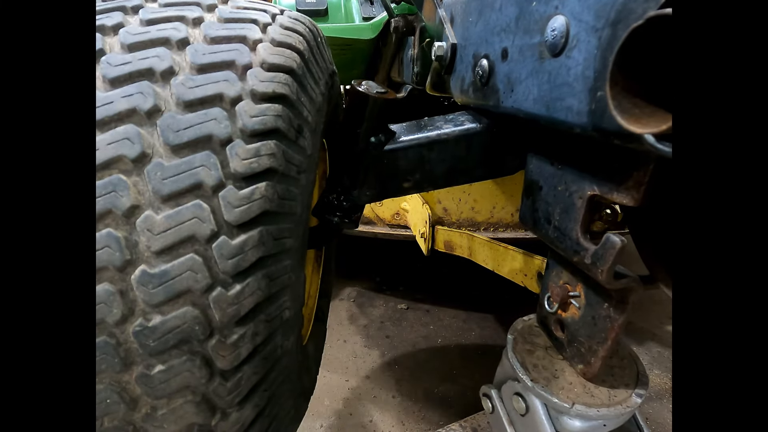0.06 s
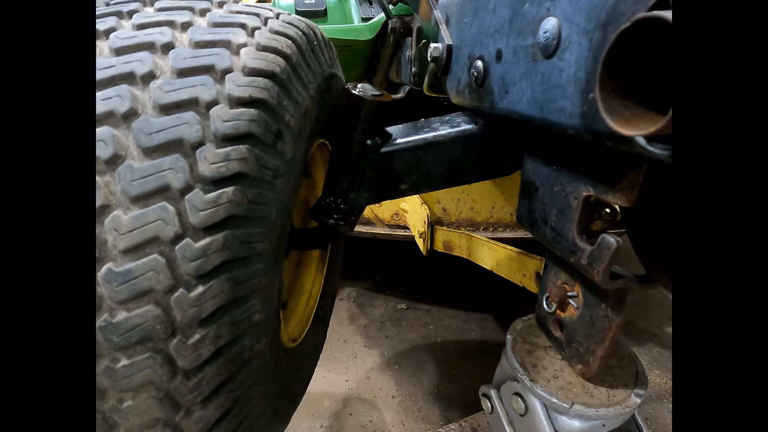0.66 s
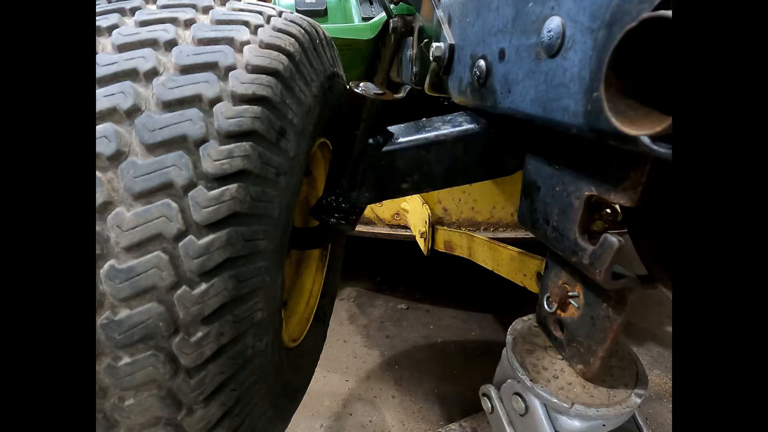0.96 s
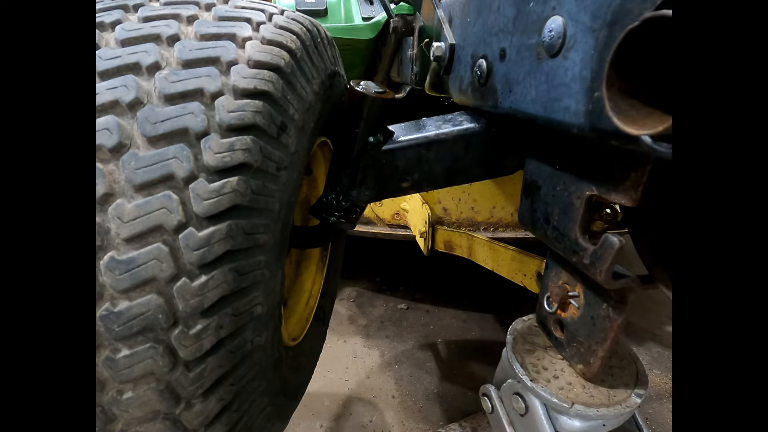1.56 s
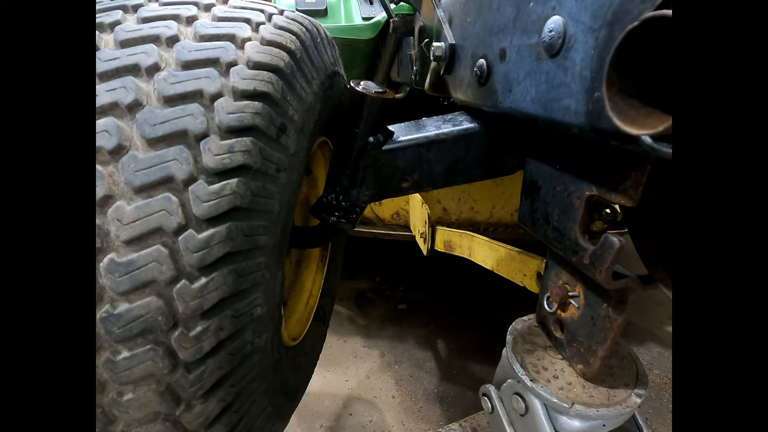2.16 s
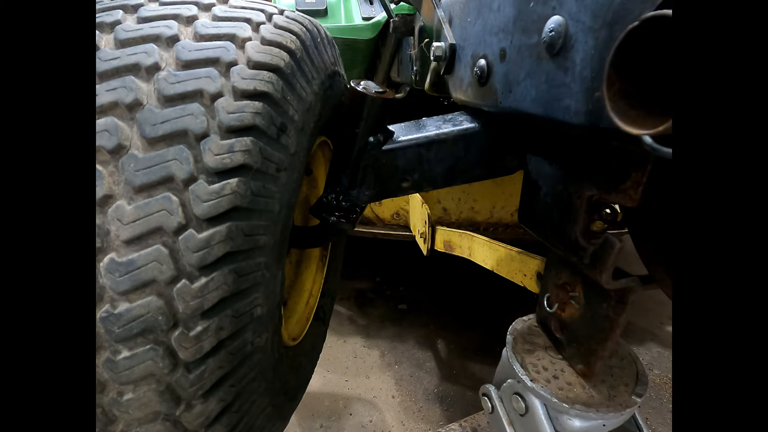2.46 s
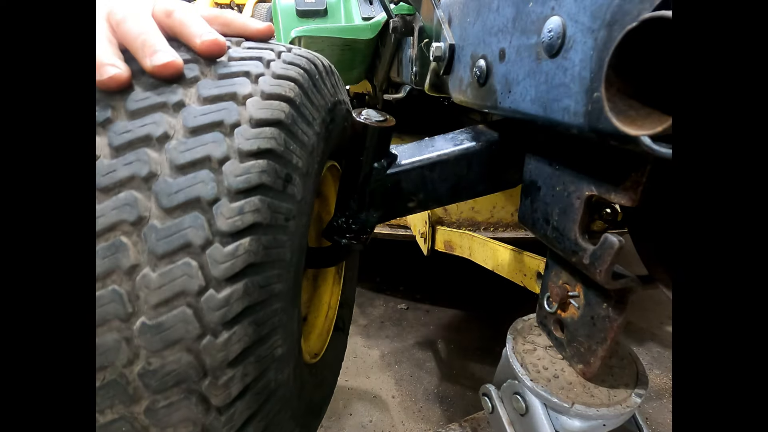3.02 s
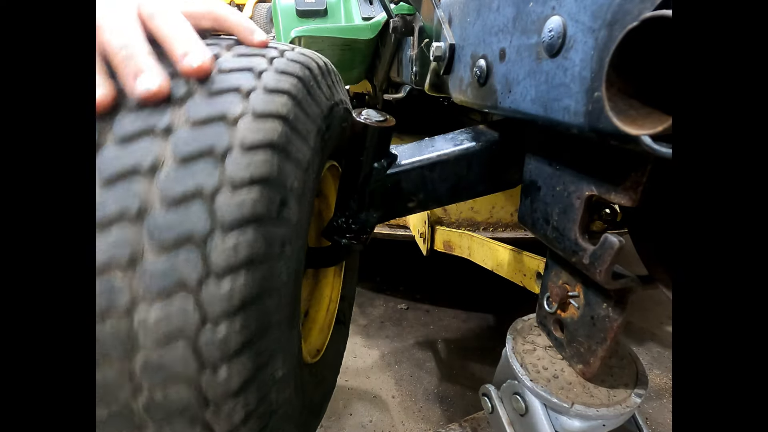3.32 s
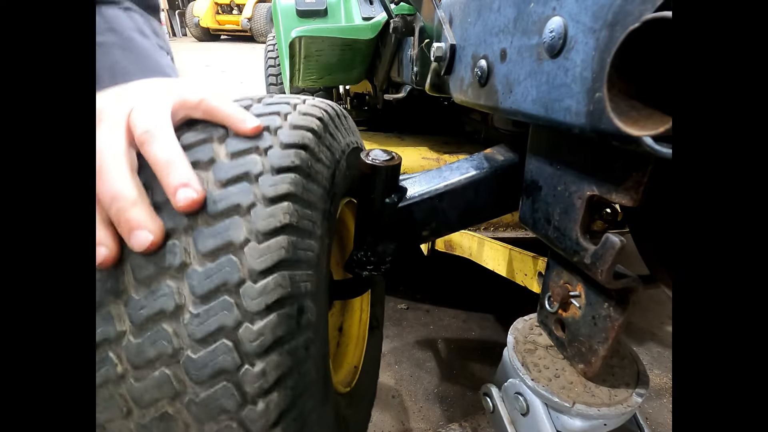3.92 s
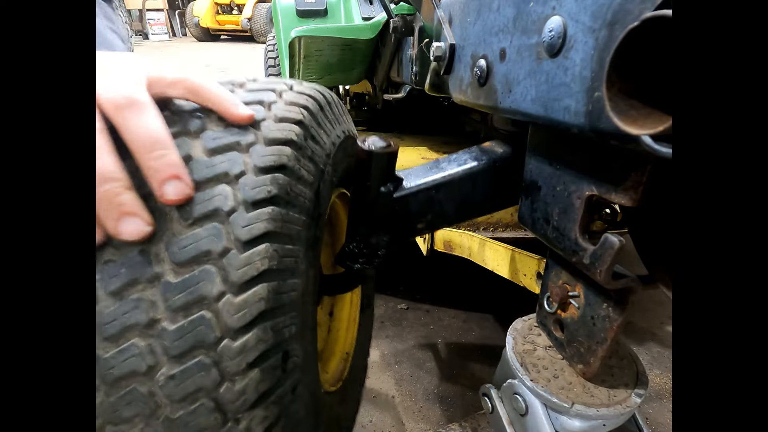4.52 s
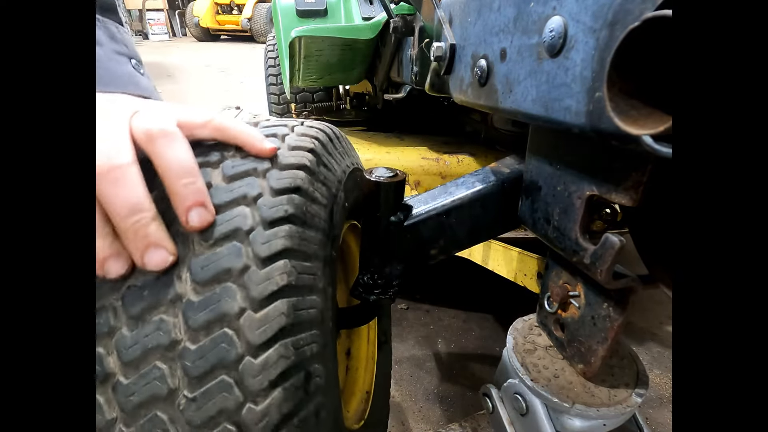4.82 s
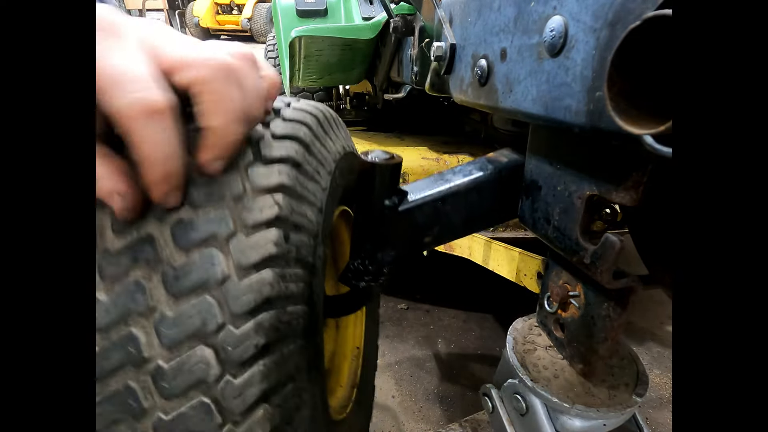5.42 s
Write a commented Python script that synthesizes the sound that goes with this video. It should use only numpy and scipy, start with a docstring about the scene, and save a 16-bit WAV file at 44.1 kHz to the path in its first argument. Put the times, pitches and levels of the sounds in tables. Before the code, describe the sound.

Rusted metal steering parts on a mower grind, creak and knock, ending in a heavy clunk that hums through the frame. After a lull, a hand thumps the rubber tyre and slides across it, snapping bits of grit. The linkage then bangs and rattles against its stop twice, with a short creak, before one more hollow tyre thump. Everything is close, with slight workshop echo over a low background hum.

```python
"""Close by in a workshop, the front wheel of a jacked-up mower is steered from lock to lock.
The rusty linkage scrapes and squeaks, then clunks against its stop, shaking the frame.
A hand slaps the tyre and rubs over its gritty tread. The wheel swings twice more, each time
hitting a stop hard and rattling in its slack, and one last slap lands on the tyre."""
import sys
import numpy as np
from scipy import signal
from scipy.fft import rfft, irfft
from scipy.io import wavfile
from scipy.ndimage import uniform_filter1d, minimum_filter1d

SR = 44100
rng = np.random.default_rng(int(sys.argv[2]) if len(sys.argv) > 2 else 0)


def put_to_file(sound):
    """Save the sound as 16-bit audio at rate SR, in the file named by the first command-line argument."""
    columns = np.atleast_2d(sound).T  # one column per channel
    safe = np.clip(columns, -1, 1)
    whole_steps = np.round(safe * 32767)
    wavfile.write(sys.argv[1], SR, whole_steps.astype(np.int16))


N = 250488

# Blows in the linkage. Each row: start in seconds, then clank, thud and hard edge levels in dB.
BLOWS = [(0.009, -47, -39, -52), (0.119, -46, -54, -50), (0.447, -29, -39, -28), (0.518, -28.5, -42, -27.5),
         (0.556, -24, -19.5, -32), (0.656, -30.5, -28, -34.5), (0.798, -33, -26, -37.5),
         (0.869, -25.5, -48, -33), (0.921, -27.5, -54, -31.5), (1.172, -36, -36, -41),
         (1.329, -19.5, -9.5, -33.5), (1.351, -20.5, -28, -29.5), (1.371, -32, -14.5, -56),
         (1.439, -39.5, -27, -52), (1.475, -32, -40, -42.5), (1.809, -41, -57.5, -48),
         (1.874, -40.5, -55, -42), (3.764, -15.5, -14, -25.5), (3.788, -16.5, -6.5, -28),
         (3.834, -17.5, -17, -26.5), (3.896, -20.5, -35, -22), (4.109, -38, -30, -62),
         (4.255, -38.5, -41, -43), (4.518, -36.5, -54, -34.5), (4.801, -17, -14.5, -24.5),
         (4.823, -15.5, -8, -25.5), (4.857, -17, -12.5, -33), (4.892, -18.5, -20.5, -18.5),
         (4.936, -20, -25, -25), (4.981, -23.5, -21, -29.5), (5.095, -27, -46, -39), (5.181, -34, -43, -54),
         (5.356, -41, -39, -42.5)]
# Where a blow's clank, thud, body, edge and fizz sit, in Hz.
BLOW_BAND_HZ = [1150, 170, 430, 5000, 11500]
# Tone of the dense clatter. Each row: frequency in Hz, level in dB.
CLATTER_EQ = [(18, -29), (30, -26), (45, -12), (75, -14.5), (148, -3), (260, -9.5), (420, -9), (560, -16),
              (800, -17), (1000, -18.5), (2400, -31), (4600, -34), (7000, -34.5), (9800, -47),
              (12000, -45.5), (15500, -70)]
# Decay of the clatter. Each row: frequency in Hz, T60 in seconds.
CLATTER_T60 = [(50, 0.35), (170, 0.6), (450, 0.27), (1100, 0.21), (3000, 0.19), (7000, 0.12), (14000, 0.13)]
# Strongest modes of axle, rim and frame. Each row: pitch in Hz, level in dB, T60 in seconds.
FRAME_MODES = [(41.5, -9.5, 0.29), (59.3, -13, 0.54), (113.5, -5.5, 0.37), (141.5, -6, 0.55),
               (170.5, -12.5, 0.6), (216, -9.5, 0.39), (345.7, -15.5, 0.62), (408.6, -8, 0.39),
               (434, -11, 0.49), (582.4, -10, 0.29), (777, -14, 0.34), (937, -16.5, 0.6),
               (1001, -15.5, 0.4), (1270, -34, 0.24), (1300, -19.5, 0.15), (1460, -16.5, 0.38),
               (2133, -16, 0.23), (2150, -32, 0.28), (2490, -25.5, 0.54), (3400, -18, 0.11),
               (4450, -20, 0.41), (6400, -3, 0.035)]


def linkage(contact_s=.0019, full_blow_db=-12.5, glance_s_per_db=.00018, crack=.59, crack_s=.0058):
    """Each blow sets off a clatter of short modes, rings the struck part and leaves the frame humming."""
    out, t = np.zeros((2, N)), np.arange(2 ** 15) / SR
    clatter_size = len(t) // 2
    clatter_trim_db, hum_trim_db = (-4, -11, -6, -5, -3), (-4, -5, -3, -4, -4)
    bands_hz = [(700, 2000), (50, 250), (300, 700), (2500, 8000), (9500, 14000)]
    hz = bins(t)
    power = amp(curve(CLATTER_EQ, hz)) ** 2
    share_db = 10 * np.log10([power[(hz > lo) & (hz < hi)].sum() / power.sum() for lo, hi in bands_hz])
    modes = np.array([(-1) ** k * ring(t, *mode) for k, mode in enumerate(FRAME_MODES)])
    mode_hz = np.array(FRAME_MODES)[:, 0]
    for start, clank, thud, edge in BLOWS:
        body = clank + .57 * (thud - clank) - 5.5
        fizz = edge - 27 - .4 * max(thud - edge, 0)  # a heavy thud damps the fizz
        force_db = np.array([clank, thud, body, edge, fizz])
        clatter = resonances(stereo_noise(clatter_size), depth_db=3, spacing_hz=129.5)
        clatter = unit_rms(eq(clatter, CLATTER_EQ))
        clatter = eq(clatter, zip(BLOW_BAND_HZ, force_db + clatter_trim_db - share_db))
        clatter = decay(clatter, CLATTER_T60)
        spot_db = 5 * rng.standard_normal(len(modes))  # each spot favours other modes
        hum = amp(spot_db + curve(zip(BLOW_BAND_HZ, force_db + hum_trim_db), mode_hz)) @ modes
        part_hz = np.array([150, 370, 1050, 3700]) * (1 + .13 * rng.uniform(-.99, 1, 4))
        part_db, part_t60 = (thud - 4, body - 6, clank - 6, edge - 8), (.15, .1, .1, .1)
        part = sum(ring(t, *mode) for mode in zip(part_hz, part_db, part_t60))
        cushion_s = contact_s * np.exp((full_blow_db - clank) / 24)  # rust cushions a weak blow most
        glance_s = glance_s_per_db * max(clank - thud, 0)  # a glancing blow scrapes and rises slower
        attack = 1 - np.exp(-t / (cushion_s + glance_s))
        bite = attack * (1 + crack * np.exp(-t / crack_s))
        add(out, start - .002, (hum + part) * attack)
        add(out, start - .002, clatter * bite[:clatter_size])
    return out


# Swings of the wheel. Each row: start in seconds, seconds until the release, level in dB.
WHEEL_SWINGS = [(-.1, .14, -41), (0.45, 0.51, -35.5), (1.11, .14, -42), (1.235, 0.11, -34.5),
                (1.719, 0.26, -50), (2.796, 0.69, -46), (3.721, 0.2, -32.5), (4.147, 0.36, -41),
                (4.726, 0.51, -38)]
# Tone of grinding rust. Each row: frequency in Hz, level in dB.
RUST_EQ = [(21, -35), (35, -0.5), (184, 4.5), (241, -15), (323, -7), (348, -1.5), (540, -12), (595, -8.5),
           (817, -14.5), (970, -8.5), (2770, -26.5), (5490, -31), (12000, -65), (15600, -76), (22000, -120)]


def pivot(attack_s=.064, release_db_per_s=37.5, creep_db=-51, hard_swing_db=-35):
    """Rust flakes grind in spurts and sound through the axle; between swings the pivot only creeps."""
    t, effort = np.arange(N) / SR, np.full(N, amp(creep_db))
    for start, hold, db in WHEEL_SWINGS:
        push = np.clip((t - start) / attack_s, 0, 1)
        release_db = release_db_per_s * np.maximum(t - start - hold, 0)
        effort = np.maximum(effort, push * amp(db - release_db))
    spurts = flicker(per_s=110, depth_db=2.5)
    grind = resonances(stereo_noise(N) * spurts, depth_db=4.5, spacing_hz=91.2)
    grind = unit_rms(eq(grind, RUST_EQ))
    rumble = eq(grind, [(170, 0), (260, -40)])
    shake = np.minimum(effort / amp(hard_swing_db), 1) ** .3  # only a hard swing rumbles in full
    return effort * (grind - rumble + shake * rumble)


# Squeaks of dry joints. Each row: start in seconds, length in seconds, pitch in Hz, level in dB.
JOINT_SQUEAKS = [(0.446, 0.046, 1290, -34), (0.476, 0.054, 1236, -24.5), (0.481, 0.1, 634, -36.5),
                 (0.794, 0.067, 398, -31), (1.472, 0.064, 4520, -51), (1.726, 0.042, 4520, -55),
                 (1.812, 0.11, 2170, -55), (3.695, 0.043, 4520, -49), (4.012, 0.034, 4490, -47),
                 (4.314, 0.072, 2200, -50), (4.982, 0.069, 426, -21), (5.168, 0.055, 4490, -45)]


def squeaks(waver=.016, overtone_db=-22, roughness=.41):
    """Stick and slip locks briefly onto one wavering mode."""
    out = np.zeros(N)
    for start, length, hz, db in JOINT_SQUEAKS:
        progress = np.linspace(0, 1, int(length * SR))
        wander = uniform_filter1d(rng.standard_normal((2, SR)), size=160)
        drift, grip = unit_rms(uniform_filter1d(wander, size=40))[:, :len(progress)]
        phase = 2 * np.pi * np.cumsum(hz * (1 + waver * drift)) / SR
        swell = np.sin(np.pi * progress ** .56) ** 2 * (1 + roughness * grip)
        add(out, start, amp(db) * swell * (np.sin(phase) + amp(overtone_db) * np.sin(2 * phase)))
    return out


# Slaps on the tyre. Each row: start in seconds, then thump, pat and air ring levels in dB.
TYRE_SLAPS = [(2.467, -18.5, -52, -55), (2.784, -0.5, -25.5, -23.5), (2.916, -17.5, -65, -41),
              (5.568, 1, -21, -51)]
# The air ringing inside the tyre. Each row: pitch in Hz, level in dB, T60 in seconds.
CAVITY_MODES = [(179.8, -2.5, 0.54), (203, -2.5, 0.18)]


def slaps(thump_hz=185, thump_t60=.027, pat_hz=900, pat_t60=.022, attack_s=.0059):
    """The fingers pat the tread, the palm dents the rubber, and the air inside rings on."""
    out, t = np.zeros(N), np.arange(SR // 2) / SR
    for start, thump_db, pat_db, air_db in TYRE_SLAPS:
        pat = ring(t, pat_hz, pat_db, pat_t60) + ring(t, .725 * pat_hz, pat_db, pat_t60)
        thump = ring(t, thump_hz, thump_db, thump_t60)
        air = sum(ring(t, hz, air_db + db, t60) for hz, db, t60 in CAVITY_MODES)
        add(out, start - .003, pat)
        add(out, start, (thump + air) * (1 - np.exp(-t / attack_s)))
    return out


# Strokes of hand and sleeve. Each row: start and length in seconds, level and treble tilt in dB.
STROKES = [(2.32, 0.13, -44.5, -1.5), (2.722, 0.041, -39.5, 1), (2.767, 0.27, -52.5, 6),
           (3.029, 0.19, -44.5, -8.5), (3.23, 0.326, -45.5, -4), (3.578, 0.28, -49.5, -7.5),
           (4.569, 0.41, -47, -7.5), (5.416, 0.26, -53.5, 7)]
# Tone of rubbed rubber. Each row: frequency in Hz, level in dB.
RUBBER_EQ = [(410, -21), (700, -11), (1190, -4.5), (1920, -4.5), (2280, -9), (2560, -12), (2870, -8),
             (6420, -7.5), (12000, -29.5), (15500, -35)]


def rubbing():
    """Each stroke swells quickly and trails off, catching and sliding over the blocks of the tread."""
    out = np.zeros((2, N))
    catches = flicker(per_s=1300, depth_db=3) * flicker(per_s=31, depth_db=4)
    friction = unit_rms(eq(stereo_noise(N) * catches, RUBBER_EQ))
    for start, length, db, tilt_db in STROKES:
        swell = np.sin(np.pi * np.linspace(0, 1, int(length * SR)) ** .57)
        stroke = friction[:, int(start * SR):][:, :len(swell)]
        stroke = resonances(stroke, depth_db=3.5, spacing_hz=259)
        stroke = unit_rms(eq(stroke, [(1500, 0), (7000, tilt_db)]))
        add(out, start, amp(db) * stroke * swell[:stroke.shape[1]])
    return out


def fine_grit(per_s=6.6):
    """Cues for faint snaps scattered through every stroke, as rows like those of GRIT_SNAPS."""
    jitter = rng.random((len(STROKES), 16))
    return [(start + (k + offset) / per_s, db + 11.5, db - 4.5)
            for (start, length, db, _), offsets in zip(STROKES, jitter)
            for k, offset in enumerate(offsets) if k + offset < length * per_s]


# The standout snaps of grit, and at 5.561 s the dull click of fingertips as the last slap lands. Each row:
# start in seconds, level in dB, sparkle in dB.
GRIT_SNAPS = [(2.726, -35, -58), (3.0377, -24.5, -57), (3.0809, -18.5, -36), (3.135, -26, -55),
              (3.2482, -22.5, -53), (3.3864, -22, -44.5), (3.4665, -22.5, -52), (4.578, -28, -52),
              (4.6434, -26, -47), (4.6945, -24.5, -48), (5.5611, -20, -52)]
# Tone of a snap. Each row: frequency in Hz, level in dB.
SNAP_EQ = [(200, -23), (1000, -2), (4500, -5), (7000, -5.5), (9500, 4.5), (12500, 2.5), (15500, -30)]


def grit(attack_s=.0005, fade_s=.0017):
    """Grit snaps under the fingers, and fingertips click on the tread, in tiny dry bursts, some dull and some
    sparkling."""
    out, t = np.zeros((2, N)), np.arange(2048) / SR
    envelope = (1 - np.exp(-t / attack_s)) * np.exp(-t / fade_s)
    for start, db, sparkle_db in GRIT_SNAPS + fine_grit():
        burst = unit_rms(eq(stereo_noise(len(t)), SNAP_EQ))
        add(out, start, envelope * eq(burst, [(6500, db + 3), (10000, sparkle_db + 8)]))
    return out


# Resonances of the tread. Each row: pitch in Hz, level in dB, T60 in seconds.
GROOVE_MODES = [(1348, -34.5, 0.055), (1720, -39, 0.062), (3070, -33.5, 0.045), (4530, -34, .04),
                (6130, -67, 0.049), (6440, -43, .03)]


def grooves(x):
    """Small sounds on the tyre ring in its grooves as in short pipes."""
    t = np.arange(4096) / SR
    response = sum(ring(t, *mode) for mode in GROOVE_MODES)
    return signal.oaconvolve(x, response[None], axes=1)[:, :N]


# Decay of the room. Each row: frequency in Hz, T60 in seconds.
WORKSHOP_T60 = [(60, 0.9), (200, 0.91), (1000, 0.73), (4000, 0.69), (12000, 0.58)]


def workshop_reverb(send, build_s=.0055):
    """The workshop's reflections build into a diffuse tail."""
    t = np.arange(SR) / SR
    tail = decay(stereo_noise(SR), WORKSHOP_T60) * (1 - np.exp(-(t / build_s) ** 2))
    return signal.fftconvolve(send.mean(0)[None], tail / np.linalg.norm(tail[0]), axes=1)[:, :N]


# Colour of the background. Each row: frequency in Hz, level in dB.
ROOM_TONE_EQ = [(15, -54), (25, -18), (140, -19), (188, -1.5), (233, -9.5), (267, -4.5), (331, -2.5),
                (359, -17.5), (410, -4), (445, -18), (482, -20), (762, -20), (826, -34), (3830, -32),
                (15500, -47.5)]


def room_tone(level_db=-46.5):
    """A steady, low bed of workshop noise."""
    return amp(level_db) * unit_rms(eq(stereo_noise(N), ROOM_TONE_EQ))


# Stereo width of all the noise. Each row: frequency in Hz, side against mid in dB.
SIDE_EQ = [(50, -30), (125, -25.5), (250, -23.5), (500, -16.5), (1000, -12), (2000, -7.5), (8000, -9),
           (13000, -6.5)]


def stereo_noise(size):
    """Noise at two close microphones: alike in the bass, less so in the treble."""
    mid, side = rng.standard_normal((2, size))
    side = eq(side, SIDE_EQ)
    return np.array([mid + side, mid - side])


def amp(db):
    """Decibels to gain."""
    return 10 ** (np.asarray(db) / 20)


def unit_rms(x):
    """Scales to an rms of one."""
    return x / np.sqrt(np.mean(x ** 2) + 1e-20)


def curve(points, hz):
    """Reads (Hz, value) points joined by straight lines over log frequency."""
    point_hz, value = np.transpose(sorted(map(tuple, points)))
    return np.interp(np.log(hz + 1), np.log(point_hz + 1), value)


def add(mix, start, sound):
    """Mixes a sound in at a start time in seconds."""
    part = mix[..., max(round(start * SR), 0):][..., :sound.shape[-1]]
    part += sound[..., :part.shape[-1]]


def bins(x):
    """The frequencies of a signal's spectrum."""
    return np.fft.rfftfreq(x.shape[-1], 1 / SR)


def eq(x, points):
    """Filters by a curve of (Hz, dB) points."""
    return irfft(rfft(x) * amp(curve(points, bins(x))), x.shape[-1])


def decay(x, t60s):
    """Lets each frequency die at its own speed."""
    hz, t, spectra = signal.stft(x, SR, nperseg=256)
    fade = amp(-60 * t / curve(t60s, hz)[:, None])
    return signal.istft(spectra * fade, SR, nperseg=256)[1][:, :x.shape[-1]]


def ring(t, hz, db, t60):
    """One damped mode."""
    return amp(db - 60 * t / t60) * np.sin(2 * np.pi * hz * t)


def flicker(per_s, depth_db):
    """A gain that jumps about at random."""
    heights = np.clip(rng.standard_normal(N), -2, 2)
    return unit_rms(amp(depth_db * np.interp(np.arange(N) / SR * per_s, np.arange(N), heights)))


def resonances(x, depth_db, spacing_hz):
    """Crowded resonances: random peaks and valleys across the spectrum."""
    heights = np.clip(rng.standard_normal(1024), -2, 2)
    ripple_db = depth_db * np.interp(bins(x) / spacing_hz, np.arange(1024), heights)
    return irfft(rfft(x) * unit_rms(amp(ripple_db)), x.shape[-1])


def scene():
    """Metal and hand sound close by; the workshop answers faintly."""
    metal = linkage() + squeaks() + pivot()
    rub, snaps, thumps = rubbing(), grit(), slaps()
    fingers = rub + snaps + grooves(amp(-19.5) * rub + snaps)
    bed = room_tone()
    send = amp(-11) * metal + amp(-8) * fingers + amp(-11.5) * thumps
    return metal + fingers + thumps + workshop_reverb(send) + bed


# Balance of the two microphone ports. Each row: frequency in Hz, left minus right in dB.
PORT_BALANCE = [(100, -.4), (500, -1.2), (2000, -1.5), (4000, -1.2), (8000, .8), (13000, -.6)]


def record(dry, left_lag_s=9e-6, ceiling_db=-5, cutoff_hz=15500):
    """The ports differ a little in level and delay; a limiter holds the peaks; a low-pass trims the top."""
    hz = bins(dry)
    left = amp(curve(PORT_BALANCE, hz) / 2) * np.exp(-1j * np.pi * hz * left_lag_s)
    ports = irfft(rfft(dry) * np.array([left, 1 / left]), N)
    gain = 1 / np.maximum(abs(ports).max(0) / amp(ceiling_db), 1)
    limited = ports * uniform_filter1d(minimum_filter1d(gain, size=400), size=400)
    lowpass = signal.firwin(511, cutoff_hz, window=("kaiser", 9), fs=SR)
    return signal.oaconvolve(limited, lowpass[None], "same")


dry = scene()
out = record(dry)
put_to_file(out)
```